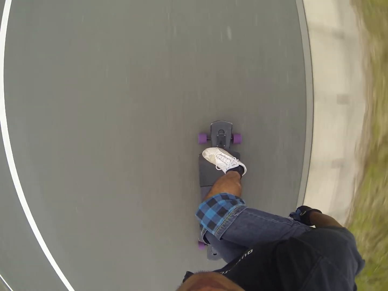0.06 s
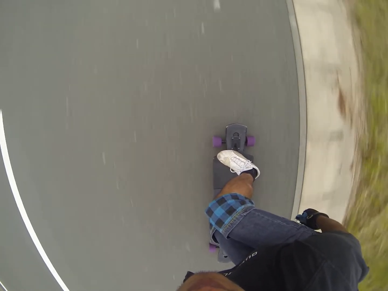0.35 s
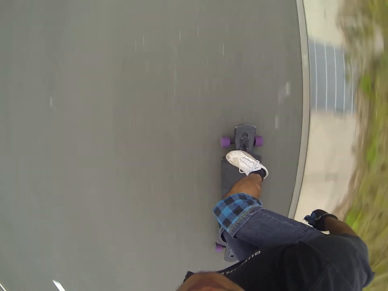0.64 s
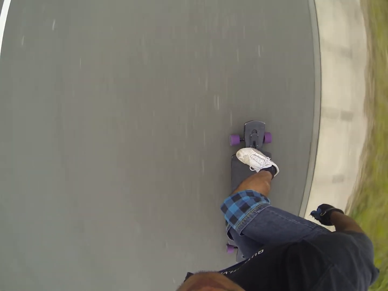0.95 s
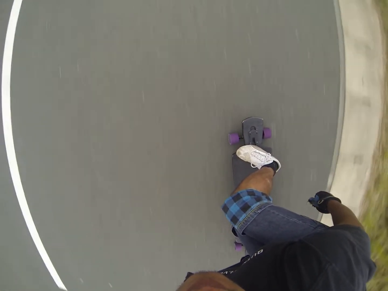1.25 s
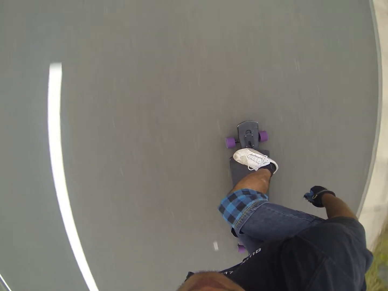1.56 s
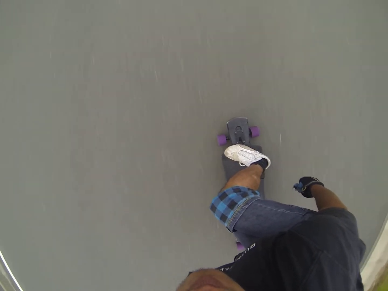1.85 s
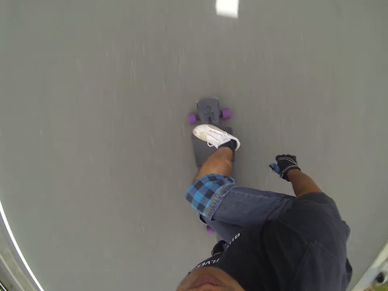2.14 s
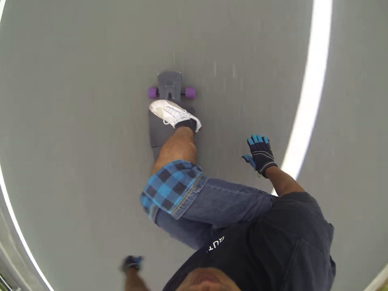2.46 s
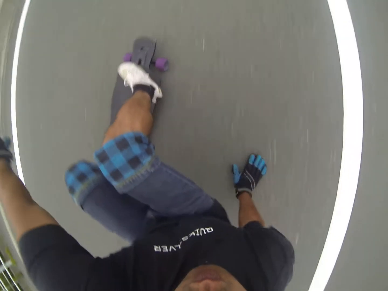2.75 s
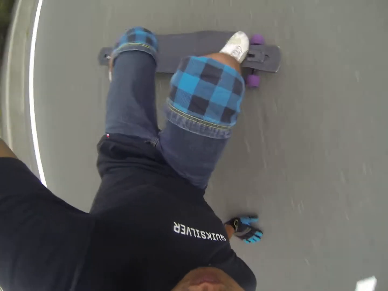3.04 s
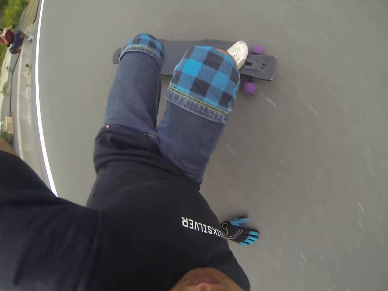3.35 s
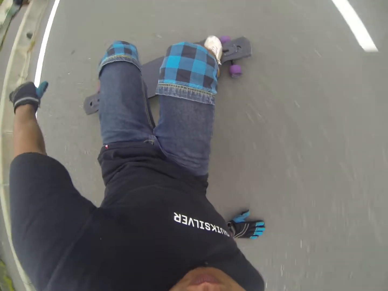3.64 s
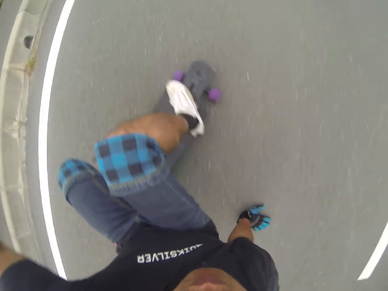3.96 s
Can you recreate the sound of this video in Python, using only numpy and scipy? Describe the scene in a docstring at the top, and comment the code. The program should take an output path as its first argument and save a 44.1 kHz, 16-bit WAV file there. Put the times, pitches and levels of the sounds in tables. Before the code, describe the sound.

Longboard wheels roll fast on asphalt, then scrape into a juddering slide, with wind buffeting.

```python
"""A longboard rolls fast down asphalt, heard from the rider's helmet; wind thumps on the microphone.
Road texture shakes the wheels into a gritty hum, and two loose grains snap in the first second.
At 2.3 s the rider crouches and the board clacks. At 2.6 s the wheels bite into a sideways slide:
the hum gives way to a juddering stick-slip scrape with groans and hard clacks, the hardest at 3.66 s.
Grit, scrape and clacks ring through the camera's housing near 1.5 kHz."""
import sys
import numpy as np
from scipy import signal
from scipy.fft import rfft, irfft, next_fast_len
from scipy.io import wavfile
from scipy.ndimage import uniform_filter1d, map_coordinates

SR = 44100
rng = np.random.default_rng(int(sys.argv[2]) if len(sys.argv) > 2 else 0)


def output_pcm(signal):
    """Save a mono or channel-first signal as 16-bit PCM at the path in sys.argv[1].

    Samples are clipped to [-1, 1] before scaling.
    """
    pcm = np.clip(np.atleast_2d(signal).T, -1, 1) * 32767
    wavfile.write(sys.argv[1], SR, np.round(pcm).astype(np.int16))


N = 176400

# wind on the microphone: time_s, level_db
WIND_LEVELS = [(0, -26.5), (0.12, -16.5), (0.25, -26.5), (0.6, -26), (0.78, -26.5), (1.15, -26.5),
               (1.9, -22.5), (2.5, -17), (3.0, -17), (3.3, -18), (3.62, -15.5), (3.73, -19.5), (4, -20.5)]
# single eddies: peak_s, level_db
WIND_THUMPS = [(0.085, -32), (2.43, -16.5), (2.555, -17.5), (2.829, -11.5), (2.938, -17), (3.021, -23),
               (3.99, -12)]
# wind spectra: freq_hz, density_db
BUFFET_SPECTRUM = [(20, -3.5), (36, -4.5), (50, -19), (80, -28), (120, -40.5), (300, -46.5), (4000, -120)]
THUMP_SPECTRUM = [(30, 4.5), (75, -17.5), (200, -27), (1500, -71.5)]

# loose grit under a wheel: start_s, pitch_hz, level_db
GRIT_SNAPS = [(0.356, 6300, -57), (0.982, 3000, -36)]
# rolling wheels: time_s, hum_db, grit_db
ROLL_LEVELS = [(0, -36, -44), (0.3, -36, -44.5), (0.48, -35, -44.5), (1.06, -32, -39.5), (1.25, -34.5, -42),
               (1.75, -39, -47.5), (1.87, -33, -44.5), (2.56, -33, -38.5), (2.62, -43, -63),
               (4.0, -57.5, -79)]
# rolling spectra: freq_hz, density_db
HUM_SPECTRUM = [(40, -12), (110, -12), (225, 2), (265, -3.5), (315, 0.5), (380, -1), (450, -9.5),
                (800, -45.5), (2000, -120)]
GRIT_SPECTRUM = [(200, -40), (500, 2.5), (860, -1.5), (960, 1.5), (1180, -7), (1300, 4.5), (1500, 3),
                 (1750, -9), (2750, -18.5), (4400, -35), (5250, -27.5), (5800, -35), (11500, -48),
                 (13300, -42.5), (15300, -53)]

# hard knocks: start_s, low_ring_db, high_ring_db, thud_db
CLACK_HITS = [(2.3225, -7.5, -20.5, -21), (2.421, -16.5, -29, -45), (3.2438, -10.5, -11.5, -33),
              (3.612, -34, -34, -28.5), (3.6599, 0, 4, -29), (3.88, -17, -29, -32.5)]
# modes of a knock: freq_hz, level_db, t60_s
LOW_MODES = [(1418, -8, 0.022), (1500, 2.5, 0.021)]
HIGH_MODES = [(2200, 3.5, 0.0087), (2428, 1.5, 0.014), (3600, -10.5, 0.0092)]
THUD_MODES = [(173, 10, 0.026), (339, 9.5, 0.026), (775, -6, 0.065), (982, 5.5, 0.036)]
# noise burst of a knock: freq_hz, density_db
CRACK_SPECTRUM = [(500, -32), (2000, -1.5), (4000, 7.5), (6000, -17), (11500, -13.5), (13300, -9),
                  (15500, -20)]

# periodic stick-slip: start_s, length_s, pitch_hz, level_db
WHEEL_GROANS = [(2.772, 0.1, 665, -37), (2.803, 0.02, 1407, -22), (3.064, 0.18, 485, -38),
                (3.37, 0.079, 677, -36), (3.413, 0.12, 485, -38.5), (3.67, .17, 660, -41.5)]
# sliding wheels: time_s, judder_db, scrape_db, rasp_db, hiss_db
SLIDE_LEVELS = [(2.3, -81, -102, -78, -67), (2.596, -47.5, -43, -50, -53), (2.603, -55, -34, -38, -41),
                (2.628, -55, -50, -70, -57), (2.637, -44.5, -34.5, -30.5, -53.5),
                (2.82, -34.5, -26.5, -29, -37.5), (2.85, -38, -30, -36, -43), (2.93, -36, -28, -33, -40),
                (3.015, -36.5, -24.5, -35.5, -42.5), (3.035, -48, -36, -46, -53),
                (3.08, -40, -33, -37.5, -46.5), (3.14, -37, -29, -34.5, -42.5),
                (3.243, -36.5, -32.5, -36.5, -44), (3.256, -45, -41, -45.5, -52.5),
                (3.52, -36.5, -31.5, -34, -40.5), (3.65, -39.5, -33, -47, -47.5),
                (3.685, -54, -42, -53, -54.5), (3.88, -45.5, -33, -46, -44), (3.99, -48.5, -54, -35.5, -42)]
# one axle bites, then the other: start_s, length_s, level_db
AXLE_BITES = [(2.599, 0.235, -41.5), (2.64, 0.19, -41)]
# rider leans harder on the wheels: peak_s, half_width_s, level_db
LEAN_SURGES = [(2.745, 0.065, -34), (3.505, 0.07, -39)]
# slide spectra: freq_hz, density_db
JUDDER_SPECTRUM = [(100, -27), (420, -11), (490, 0.5), (570, -4.5), (665, 2.5), (850, -8.5), (940, -2.5),
                   (1130, -11), (3000, -120)]
SCRAPE_SPECTRUM = [(1050, -51), (1280, -5), (1410, 4.5), (1550, -4.5), (1760, -19), (1860, -5), (2400, -56),
                   (5000, -120)]
RASP_SPECTRUM = [(900, -61), (1500, 3.5), (1900, -4.5), (2450, 0), (2800, -7.5), (3100, -7), (3600, -29),
                 (8000, -81.5)]
HISS_SPECTRUM = [(1500, -36), (3000, -12), (3450, 4), (4300, -7), (5300, -5.5), (5700, -12), (8300, -16),
                 (12000, -28.5), (13600, -32), (15300, -40)]
BITE_SPECTRUM = [(1200, -29), (2300, -2), (2800, -13), (3450, 7), (5250, -2.5), (5800, -14), (6400, -12),
                 (7300, -25), (9600, -14), (10500, -28), (14000, -32)]
SURGE_SPECTRUM = [(1200, -37), (2300, -9), (2950, 7), (3500, -4), (4300, -15), (7000, -32), (7950, -13.5),
                  (9000, -39)]


def amp(db):
    """Decibels to gain."""
    return 10 ** (np.asarray(db) / 20)


def unit_rms(x):
    """Scale to rms 1."""
    return x / np.sqrt(np.mean(x ** 2) + 1e-20)


def curves(rows):
    """Per-sample curve for each column after time_s."""
    time_s, *columns = np.transpose(rows)
    return [np.interp(np.arange(N) / SR, time_s, column) for column in columns]


def wobble(rate_hz):
    """Smooth random curve with knots at rate_hz."""
    knots = rng.standard_normal(N // 8)
    return map_coordinates(knots, [np.arange(N) * rate_hz / SR + 4], mode="wrap")


def filtered(x, response):
    """Zero-phase filter with gain response(hz)."""
    size = next_fast_len(N + SR // 2)
    return irfft(rfft(x, size) * response(np.fft.rfftfreq(size, 1 / SR)), size)[:N]


def coloured(x, spectrum):
    """Shape x by a spectrum on a log frequency axis; rms 1."""
    freq_hz, density_db = np.transpose(spectrum)
    response = lambda hz: amp(np.interp(np.log(hz + 1), np.log(freq_hz + 1), density_db))
    return unit_rms(filtered(x, response))


def noise(spectrum):
    """Shaped Gaussian noise; rms 1."""
    return coloured(rng.standard_normal(N), spectrum)


def stones(rate_hz, spread_db, friction):
    """Tiny uneven impacts on road stones over smooth friction noise."""
    hits = (rng.random(N) < rate_hz / SR) * rng.choice([-1, 1], N)
    sizes = amp(spread_db * rng.standard_normal(N))
    return unit_rms(unit_rms(hits * sizes) + friction * rng.standard_normal(N))


def patchy(x, depth_db):
    """Changing road contact: random gain patches in time and frequency."""
    bins = signal.stft(x, nperseg=1024)[2]
    patches = uniform_filter1d(rng.standard_normal(bins.shape), size=5, axis=0)
    patches = uniform_filter1d(patches, size=9, axis=1)
    return signal.istft(bins * amp(depth_db * unit_rms(patches)), nperseg=1024)[1][:N]


def wind(split_hz=45, thump_half_width_s=0.02):
    """Eddies push on the microphone, the faster ones in lumps; a few hit with a thump."""
    t = np.arange(N) / SR
    level_db, = curves(WIND_LEVELS)
    buffet = noise(BUFFET_SPECTRUM)
    slow = filtered(buffet, lambda hz: 1 / (1 + (hz / split_hz) ** 4))
    lumps = (buffet - slow) * amp(5.0 * wobble(26.65))
    thump_gain = sum(amp(db) * np.exp(-((t - peak_s) / thump_half_width_s) ** 2)
                     for peak_s, db in WIND_THUMPS)
    return amp(level_db) * (slow + lumps) + thump_gain * noise(THUMP_SPECTRUM)


def grit_snaps(t60_s=0.018, half_width_oct=0.3):
    """Loose grit snaps under a wheel: short, bright noise bursts."""
    out, t = np.zeros(N + SR), np.arange(SR // 10) / SR
    for start_s, pitch_hz, db in GRIT_SNAPS:
        band = lambda hz: np.exp(-(np.log2((hz + 1) / pitch_hz) / half_width_oct) ** 2)
        burst = unit_rms(filtered(rng.standard_normal(N), band))[SR:SR + len(t)]
        out[round(start_s * SR):][:len(t)] += amp(db - 60 * t / t60_s) * burst
    return out[:N]


def rolling(axle_lag_s=0.052, lag_drift=0.046, rear_gain=0.58):
    """Road texture shakes the front wheels, then the rear: deck hum with grit above it."""
    hum_db, grit_db = curves(ROLL_LEVELS)
    front = stones(rate_hz=900, spread_db=2.5, friction=0.72)
    lag_samples = axle_lag_s * (1 + lag_drift * wobble(2.2)) * SR
    rear = np.interp(np.arange(N) - lag_samples, np.arange(N), front)
    hum = coloured(front + rear_gain * rear, HUM_SPECTRUM)
    grit = coloured(stones(rate_hz=1800, spread_db=-0.5, friction=0.84), GRIT_SPECTRUM)
    return amp(hum_db) * hum + amp(grit_db + wobble(29.96)) * grit


def ring(modes, t, rise_s=0.002):
    """Damped modes that swell over the contact time."""
    swell = 1 - np.exp(-(t / rise_s) ** 2)
    return swell * sum(amp(db - 60 * t / t60_s) * np.sin(2 * np.pi * (hz * t + rng.random()))
                       for hz, db, t60_s in modes)


def clacks(crack_t60_s=0.0072):
    """Board and slide glove knock on the road and ring; only hard blows crack."""
    out, t = np.zeros(N + SR), np.arange(SR // 8) / SR
    for start_s, low_db, high_db, thud_db in CLACK_HITS:
        crack_db = -22 + 1.84 * high_db
        crack = amp(crack_db - 60 * t / crack_t60_s) * noise(CRACK_SPECTRUM)[SR:SR + len(t)]
        ringing = amp(low_db) * ring(LOW_MODES, t) + amp(high_db) * ring(HIGH_MODES, t)
        thud = amp(thud_db) * ring(THUD_MODES, t)
        out[round(start_s * SR):][:len(t)] += crack + ringing + thud
    return out[:N]


def groans(wander=0.01208, roughness=0.045):
    """Stick-slip locks onto a wheel resonance: rough tones that swell and fade."""
    out, t = np.zeros(N), np.arange(N) / SR
    for start_s, length_s, pitch_hz, db in WHEEL_GROANS:
        freq_hz = pitch_hz * (1 + wander * wobble(22) + roughness * wobble(250))
        tone = np.sqrt(2) * np.sin(2 * np.pi * np.cumsum(freq_hz) / SR)
        swell = np.sin(np.pi * np.clip((t - start_s) / length_s, 0, 1))
        out += amp(db + 1.8 * wobble(110)) * swell * tone
    return out


def coarse_rub(spectrum):
    """A wheel drags over coarse stones with uneven contact; rms 1."""
    road = stones(rate_hz=2200, spread_db=1.5, friction=0.79)
    return coloured(patchy(road, depth_db=2.93), spectrum)


def slide(bite_edge_s=0.0033):
    """Wheels bite, then stick and slip sideways in surges; one uneven chatter shakes all layers."""
    t = np.arange(N) / SR
    judder_db, scrape_db, rasp_db, hiss_db = curves(SLIDE_LEVELS)
    chatter_db = 0.98 * wobble(59) + 1.12 * wobble(260)
    bites = np.zeros(N)
    for start_s, length_s, db in AXLE_BITES:
        gate = np.clip(np.minimum(t - start_s, start_s + length_s - t) / bite_edge_s, 0, 1)
        bites += amp(db) * gate * coarse_rub(BITE_SPECTRUM)
    fine_road = stones(rate_hz=7000, spread_db=1.0, friction=0.95)
    hiss = amp(hiss_db) * coloured(patchy(fine_road, depth_db=3.0), HISS_SPECTRUM)
    judder = amp(judder_db) * coarse_rub(JUDDER_SPECTRUM)
    scrape = amp(scrape_db) * noise(SCRAPE_SPECTRUM)
    rasp = amp(rasp_db) * coarse_rub(RASP_SPECTRUM)
    surge_gain = sum(amp(db) * np.exp(-((t - peak_s) / half_width_s) ** 2)
                     for peak_s, half_width_s, db in LEAN_SURGES)
    surges = surge_gain * coarse_rub(SURGE_SPECTRUM)
    return amp(chatter_db) * (bites + surges + judder + scrape + rasp + hiss)


def scene():
    """Open air, one microphone."""
    return (wind() + rolling() + slide() + groans() + clacks() + grit_snaps())[None]


def record(dry):
    """The camera hard-limits at full scale and cuts the top treble."""
    cutoff_hz = 15300
    return filtered(np.clip(dry[0], -1, 1), lambda hz: hz < cutoff_hz)[None]


dry = scene()
out = record(dry)
output_pcm(out)
```